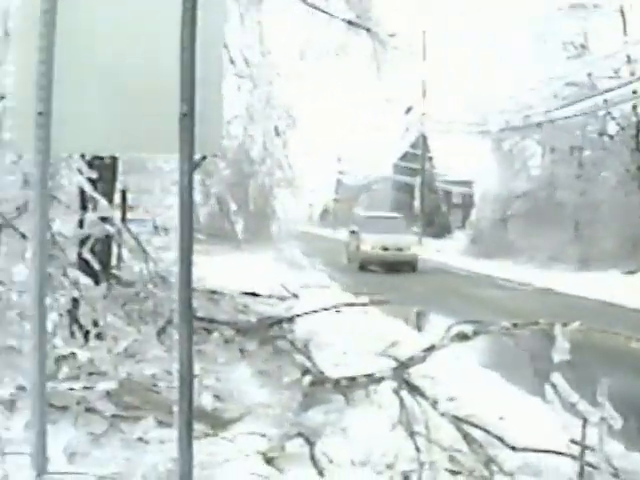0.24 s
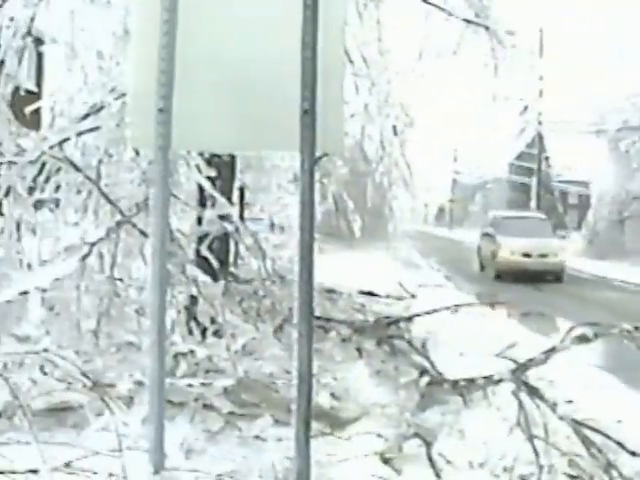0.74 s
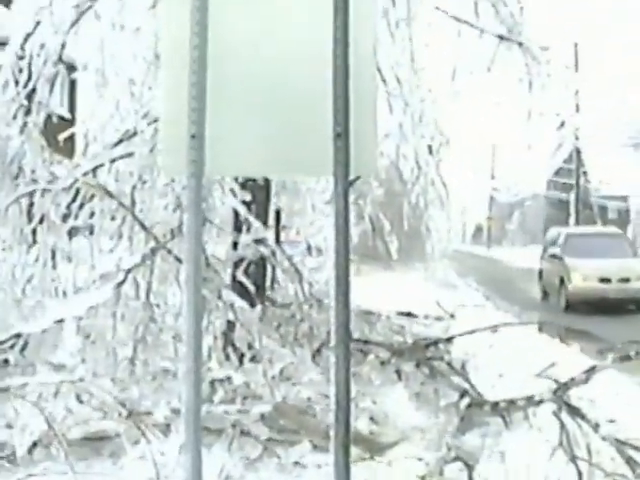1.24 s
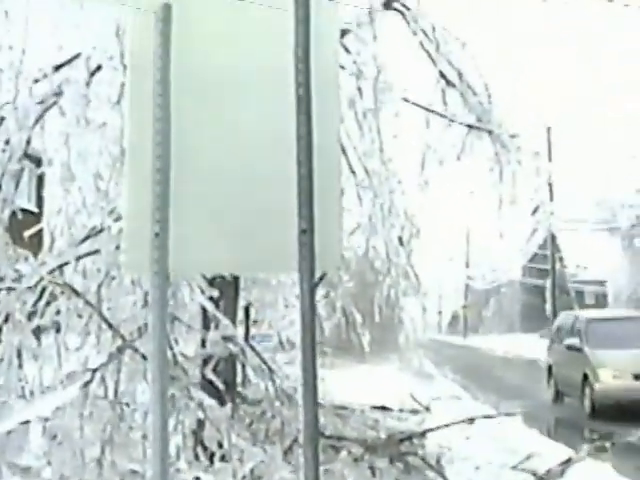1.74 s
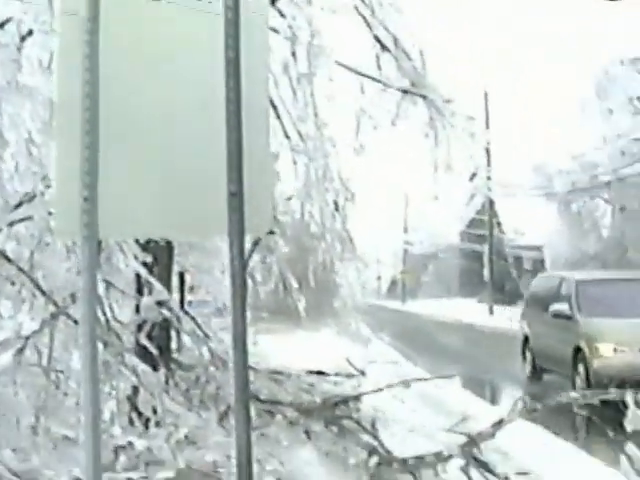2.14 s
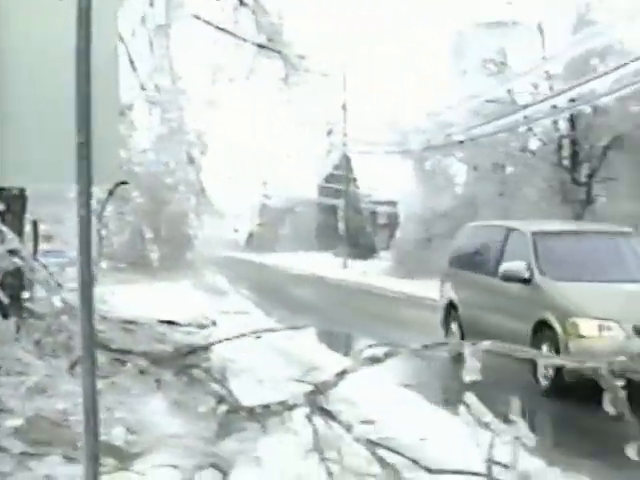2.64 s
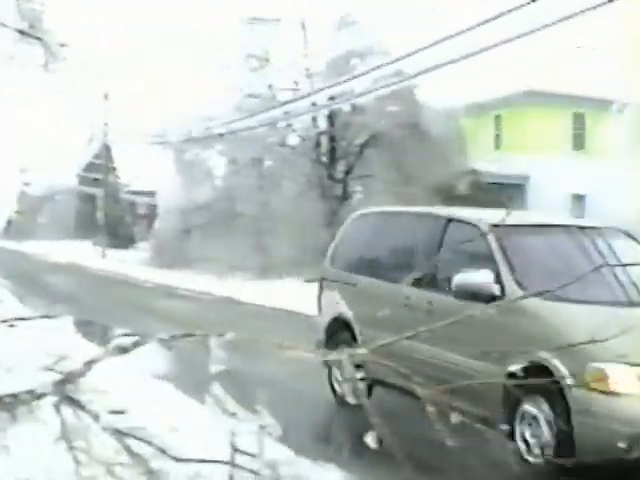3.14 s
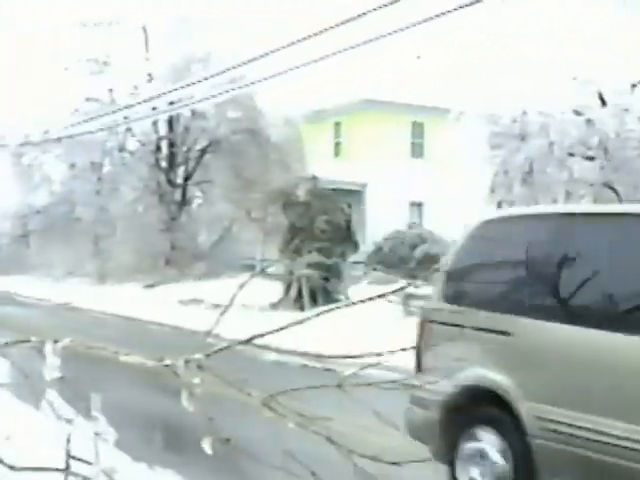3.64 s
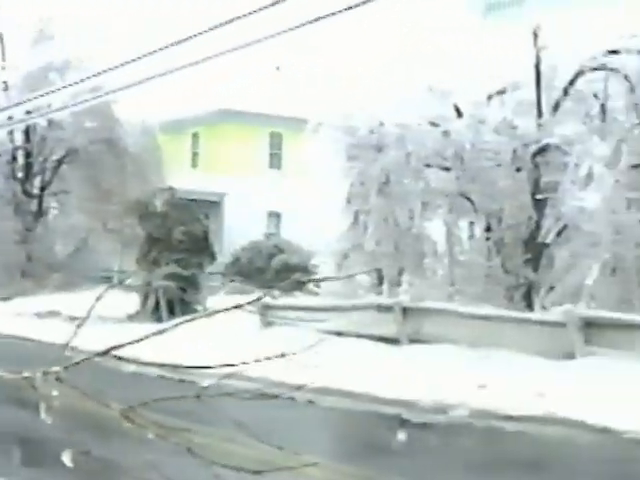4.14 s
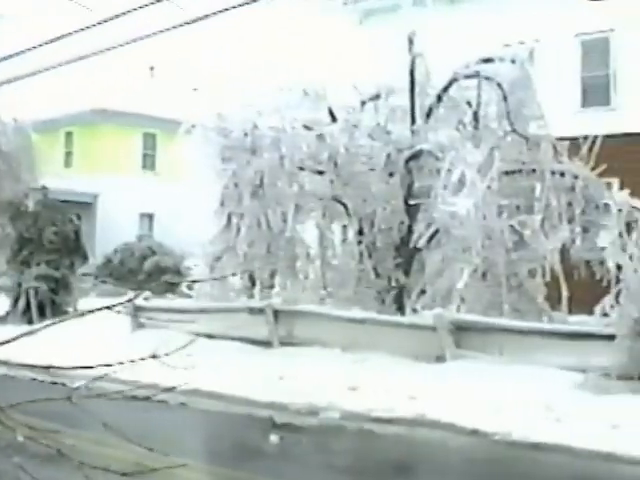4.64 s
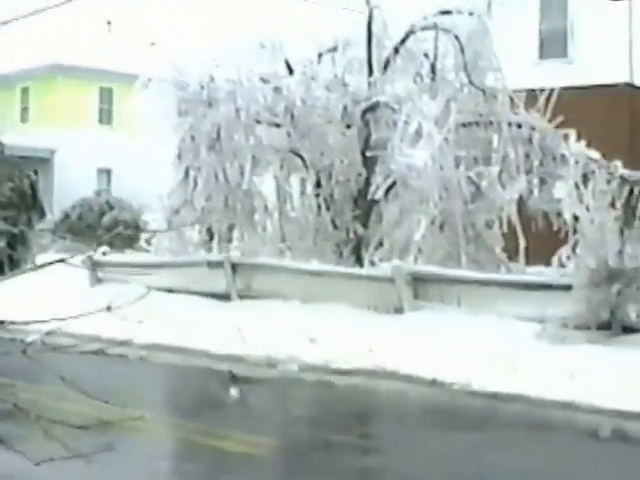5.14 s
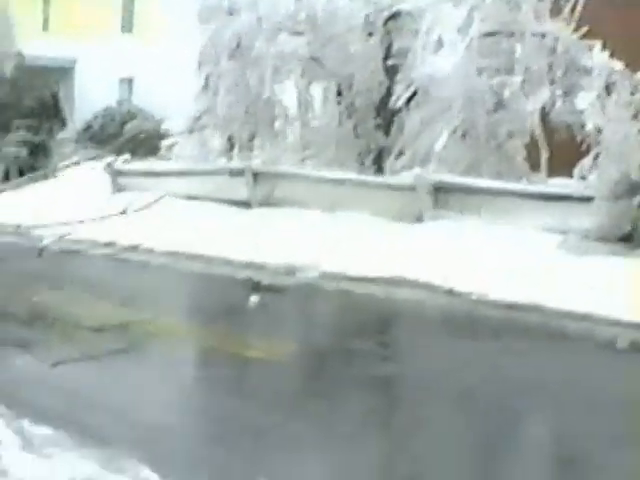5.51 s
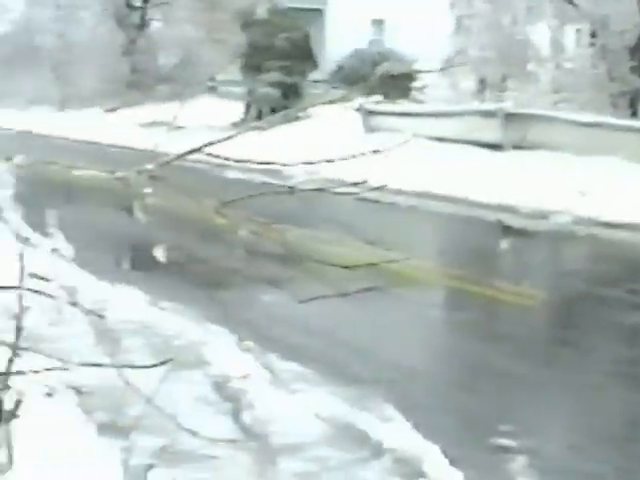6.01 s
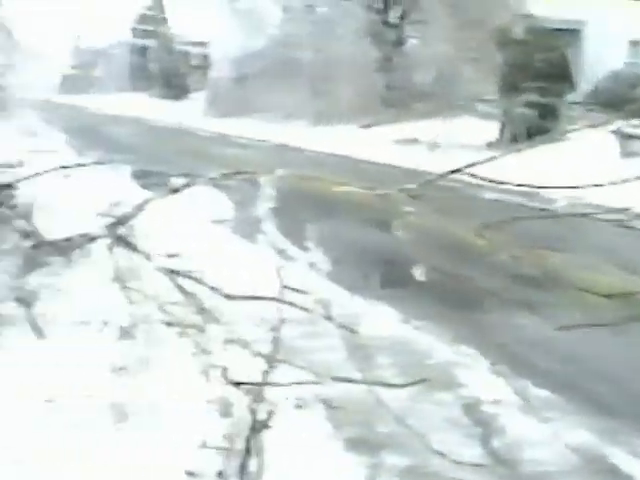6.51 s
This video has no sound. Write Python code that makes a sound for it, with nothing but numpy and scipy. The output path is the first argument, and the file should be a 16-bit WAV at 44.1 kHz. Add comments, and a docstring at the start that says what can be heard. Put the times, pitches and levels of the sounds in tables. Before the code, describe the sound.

A van approaches and passes on a slushy road outdoors, heard from the verge. Dense wet tyre hiss pulses gently with each wheel turn over a low engine rumble. A hard knock on the camera body briefly ducks the sound early on; smaller knocks follow. As the van recedes, fine spray, a sliding tyre resonance and a faint exhaust drone emerge, then fade. Nearly everything sits in the left channel.

```python
"""Minivan passing on a slushy road

A minivan rolls past on a wet, slushy road, heard from the verge through a hand-held camcorder.
The tyres are shaped noise: droplet hiss that swells with each wheel turn, fine spray, sliding resonances and a roar.
Noise rumble and a wavering sine drone make the engine; decaying sines make the knocks on the camera body.
The hardest knock makes the gain control duck. Nearly all sound is in the left channel."""
import sys
import numpy as np
from scipy import signal
from scipy.fft import rfft, irfft, next_fast_len
from scipy.io import wavfile
from scipy.ndimage import uniform_filter1d, map_coordinates

SR = 44100
rng = np.random.default_rng(int(sys.argv[2]) if len(sys.argv) > 2 else 0)


def generate_wav(sig):
    """Save sig (samples, or channels by samples) to the path in sys.argv[1] as 16-bit PCM at SR."""
    pcm = np.round(np.clip(np.atleast_2d(sig).T, -1, 1) * 32767).astype(np.int16)
    wavfile.write(sys.argv[1], SR, pcm)


N = 298557  # length in samples


def amp(db):
    """Decibels to gain."""
    return 10 ** (np.asarray(db) / 20)


def unit(x):
    """Scale to rms 1."""
    return x / np.sqrt(np.mean(x ** 2) + 1e-20)


def curves(rows):
    """One value per sample for each column after the time."""
    times, *columns = np.transpose(rows)
    t = np.arange(N) / SR
    return [np.interp(t, times, column) for column in columns]


def wobble(rate):
    """A smooth random curve, rate knots a second."""
    knots = rng.standard_normal(int(N * rate / SR) + 4)
    return map_coordinates(knots, [np.arange(N) * rate / SR])


def filtered(x, response):
    """x times a response of frequency, padded so that the end does not wrap round."""
    m = next_fast_len(N + SR // 4)
    spectrum = rfft(x, m) * response(np.fft.rfftfreq(m, 1 / SR))
    return irfft(spectrum, m)[..., :N]


def coloured(x, spectrum):
    """x shaped by (Hz, dB) points on a log frequency axis, at rms 1."""
    f, db = np.transpose(spectrum)
    return unit(filtered(x, lambda hz: amp(np.interp(np.log(hz + 1), np.log(f), db))))


def rush(patchy_db):
    """White noise whose time-frequency patches have random gain, like uneven turbulence."""
    z = signal.stft(rng.standard_normal(N), nperseg=1024)[2]
    field = uniform_filter1d(rng.standard_normal(z.shape), size=7, axis=0)  # across frequency
    field = uniform_filter1d(field, size=9, axis=1)  # across time
    patches = z * amp(patchy_db * unit(field))
    return unit(signal.istft(patches, nperseg=1024)[1][:N])


def splatter(rate, spread_db, share, patchy_db):
    """Tiny droplet impacts of uneven size, rate a second, take a share of the power; the rest is rush."""
    impacts = (rng.random(N) < rate / SR) * rng.choice([-1, 1], N)
    drops = impacts * amp(spread_db * np.clip(rng.standard_normal(N), -2, 2))
    return np.sqrt(share) * unit(drops) + np.sqrt(1 - share) * rush(patchy_db)


def circuit_hiss():
    """Faint steady noise of the camera's own circuits."""
    spectrum = [(100, 14), (600, 1), (10500, -2.0), (12000, -20)]  # Hz, relative dB
    return amp(-72.5) * coloured(rng.standard_normal(N), spectrum)


# Colour of the low rumble of engine and road. Each row: frequency in Hz, relative level in dB per Hz.
RUMBLE_COLOUR = [(25, -41), (48, -46), (68, -5.5), (90, -17.5), (130, -8.5), (180, -2.5), (260, 1),
                 (340, -4), (450, -6), (700, -9.5), (1500, -31.5)]
# Loudness of that rumble at the verge. Each row: time in seconds, level in dB.
RUMBLE_LEVEL = [(0, -43), (0.9, -37.5), (2.0, -39), (2.9, -40.5), (3.5, -45), (4.2, -40), (5.1, -38),
                (6.77, -40)]
# The exhaust droning as the van draws away. Each row: time in seconds, pitch in Hz, level in dB.
EXHAUST_DRONE = [(3.8, 345, -57), (4.25, 338.5, -46), (5.2, 329.6, -48), (6.77, 329.4, -64)]


def engine():
    """Low noise rumble of engine and road, with an exhaust note unsteady in pitch and level."""
    rumble_db = curves(RUMBLE_LEVEL)[0]
    rumble = amp(rumble_db) * coloured(rush(patchy_db=2.5), RUMBLE_COLOUR)
    hz, drone_db = curves(EXHAUST_DRONE)
    phase = 2 * np.pi * np.cumsum(hz * (1 + 0.034 * wobble(40))) / SR
    note = np.sin(phase) * amp(3.5 * wobble(11))
    return rumble + amp(drone_db) * unit(note)


# Knocks on the camera, right at the microphone.
# Each row: start in seconds, ring pitch in Hz, ring level in dB, thud level in dB, both before decay and low cut.
CAMERA_KNOCKS = [(1.2175, 203, -6.5, -0.5), (1.549, 178, -26, -10), (2.295, 160, -31.5, -17.5),
                 (2.469, 238, -27, -27), (3.924, 172, -27, -25), (5.436, 182, -23, -8),
                 (5.518, 220, -24, -40), (5.625, 165, -28, -27), (6.419, 171, -21, -28)]
TICK_DB = -2.5  # tick of a knock relative to its thud


def decaying_mode(t, hz, t60):
    """A sine that falls 60 dB in t60 seconds, like one struck resonance."""
    return np.sin(2 * np.pi * hz * t) * 1000 ** (-t / t60)


def knocks(ring_t60=0.087, low_cut_hz=135):
    """Each knock gives a soft plastic tick, a dull thud and a short low ring of the camera body."""
    out = np.zeros(N + SR)
    t = np.arange(SR // 4) / SR
    contact = 1 - np.exp(-t / 0.0006)  # a soft contact rounds the onset
    thud = decaying_mode(t, 340, 0.014)
    tick = decaying_mode(t, 1750, 0.009) - 0.5 * decaying_mode(t, 1000, 0.009)
    blow = contact * (thud + amp(TICK_DB) * tick)
    for s, hz, ring_db, thud_db in CAMERA_KNOCKS:
        ring = amp(ring_db) * decaying_mode(t, hz, ring_t60) * (1 - np.exp(-t / 0.001))
        out[round(s * SR):][:len(t)] += ring + amp(thud_db) * blow
    # the small body passes no deep bass
    low_cut = signal.butter(4, low_cut_hz, "highpass", fs=SR, output="sos")
    return signal.sosfilt(low_cut, out[:N])


# The tyres coming nearer, passing and receding. Each row: time in seconds, level of the tyre noise in dB.
PASS_LEVEL = [(0, -22.5), (0.5, -24.5), (1.15, -25.5), (1.52, -27), (1.92, -22), (2.5, -20), (2.66, -23.5),
              (2.77, -21.5), (3.4, -22.5), (4.0, -23.5), (4.4, -23.5), (4.8, -23.5), (5.65, -26.5),
              (6.1, -28), (6.77, -30.5)]
# A tyre cutting through deeper slush. Each row: time of the surge in seconds, extra level in dB.
PUDDLES = [(2.36, 2.8), (3.75, 0.5)]
PUDDLE_S = 0.055  # half the length of a surge, seconds


def slush():
    """Level of the tyre noise in dB: the slow pass, with a short surge at each puddle."""
    t = np.arange(N) / SR
    surges_db = sum(db * np.exp(-((t - s) / PUDDLE_S) ** 2) for s, db in PUDDLES)
    return curves(PASS_LEVEL)[0] + surges_db


WHEEL_TURNS_PER_S, FIRST_SWELL_S, SWELL_DB = 2.99, 0.093, 1.4


def wheel_swell():
    """Rise and fall in dB, by SWELL_DB either way, over each turn of the wheels."""
    t = np.arange(N) / SR
    return SWELL_DB * np.cos(2 * np.pi * WHEEL_TURNS_PER_S * (t - FIRST_SWELL_S))


# Which side of the van faces the verge.
# Each row: time in seconds, side heard (0 far ahead, 1 close beside, 2 behind).
SIDE_HEARD = [(0, 0.087), (1.2, 0.31), (1.8, 0.88), (3.5, 1.12), (3.72, 0.9), (4.0, 1.84), (6.77, 1.943)]


def side_heard():
    """The side of the van that is heard, sliding from 0 (far ahead) towards 2 (behind)."""
    return np.clip(curves(SIDE_HEARD)[0], 0, 2)


# Colour of the tread roar off the road. Each row: frequency in Hz, relative level in dB per Hz.
ROAR_COLOUR = [(150, -31), (350, -14.5), (520, -10.5), (750, -5.5), (1000, -2.5), (1300, -0.5),
               (1600, -4.5), (2200, -24.5), (5000, -68)]
# roar relative to the pass level from far ahead, and its gain for each step of side
ROAR_AHEAD_DB, ROAR_TURN_DB = -6.5, 1.17


def tread_roar(side, swell_db, roar_swell=0.18):
    """Dull, fairly even noise of the tread, stronger from behind."""
    roar_db = ROAR_AHEAD_DB + ROAR_TURN_DB * side + roar_swell * swell_db
    return amp(roar_db + 1.0 * wobble(30)) * coloured(rush(patchy_db=0.25), ROAR_COLOUR)


# Colour of the fine spray off the tyres. Each row: frequency in Hz, relative level in dB per Hz.
SPRAY_COLOUR = [(3000, -19), (5500, 3), (6800, 0.5), (8200, 0), (9800, 1.5), (11000, -9), (12300, -15.5),
                (13500, -56), (14200, -42)]
# Spray masked as the van comes alongside, strongest in its wake.
# Each row: time in seconds, level in dB relative to the pass level.
SPRAY_LEVEL = [(0, -14.5), (0.3, -13.5), (0.5, -15.5), (1.3, -17), (2.0, -24), (3.0, -21.5), (3.75, -15),
               (4.55, -12.5), (5.1, -17), (6.3, -20.5)]


def spray(swell_db, spray_swell=0.28):
    """High, fluttering noise of droplets of very uneven size."""
    spray_db = curves(SPRAY_LEVEL)[0] + spray_swell * swell_db
    droplets = splatter(rate=4500, spread_db=8, share=0.3, patchy_db=2.2)
    return amp(spray_db + 1.04 * wobble(56)) * coloured(droplets, SPRAY_COLOUR)


# Wet treads resonating, high from the front, lower from behind, rising again with distance.
# Each row: time in seconds, centre in Hz, level in dB relative to the pass level.
RESONANCE = [(1.55, 1900, -16), (1.8, 1880, -8), (3.55, 1995, -7), (3.8, 1500, -20), (4.1, 1280, -19),
             (4.7, 1319, -11), (5.35, 1478, -4.5), (5.95, 1675, -4.5), (6.77, 1783, -9)]
# Bands of that resonance, moving together. Each row: multiple of the centre, width in Hz, level in dB.
RESONANCE_BANDS = [(0.498, 170, -11), (1, 547, 0), (1.711, 320, -7.5)]


def tread_resonance(flutter_db=1.4):
    """Fluttering bands of the wet tyre noise that slide together as the van turns past."""
    hz, level_db = curves(RESONANCE)
    phase = 2 * np.pi * np.cumsum(hz) / SR
    out = np.zeros(N)
    for multiple, width_hz, db in RESONANCE_BANDS:
        # two slow noises on a cosine and a sine make a noise band round the moving centre
        a, b = filtered(rng.standard_normal((2, N)), lambda f: 1 / (1 + (2 * f / width_hz) ** 4))
        band = a * np.cos(multiple * phase) + b * np.sin(multiple * phase)
        out += amp(db) * unit(band * amp(flutter_db * wobble(24)))
    return amp(level_db) * out


# Colour of the hiss with the van far ahead. Each row: frequency in Hz, relative level in dB per Hz.
HISS_FAR = [(700, -23.5), (1250, -5), (1650, 2.5), (2100, 0), (2450, 1), (2850, 1.5), (3400, 0.5),
            (4350, -3), (5200, -13.5), (6600, -21), (8200, -60), (14000, -48)]
# Colour of the hiss close beside, from ahead of the tyres. Each row: frequency in Hz, relative level in dB per Hz.
HISS_FRONT = [(700, -34.5), (1250, -15.5), (1600, -3), (1970, -0.5), (2400, -3.5), (2780, -1.5), (3300, -7),
              (4300, -8.5), (5300, -18), (6700, -22), (8200, -33), (14000, -60)]
# Colour of the hiss from behind the tyres. Each row: frequency in Hz, relative level in dB per Hz.
HISS_REAR = [(700, -27), (1250, -3), (1700, 1.5), (2120, -2), (2530, -0.5), (3100, -4.5), (3700, -3.5),
             (4400, -10.5), (5400, -20.5), (7000, -36.5), (9000, -35), (14000, -57)]


def slush_hiss(side, swell_db, hiss_gain_db=0.63):
    """Dense droplets over a rush of water, changing colour as the van goes by."""
    hiss = np.zeros(N)
    for place, colour in enumerate([HISS_FAR, HISS_FRONT, HISS_REAR]):
        share = np.maximum(1 - np.abs(side - place), 0)  # neighbouring colours blend at constant power
        droplets = splatter(rate=3000, spread_db=1.5, share=0.22, patchy_db=1.5)
        hiss += np.sqrt(share) * coloured(droplets, colour)
    flutter_db = 0.58 * wobble(45) + 0.42 * wobble(160)  # lumps of slush make the hiss flutter
    return hiss * amp(hiss_gain_db + swell_db + flutter_db)


# The tyre noise dulling and dropping for an instant. Each row: time in seconds, treble depth in dB.
DIPS = [(.948, 2), (1.824, 13.5), (2.452, 11), (4.001, 13)]
DIP_S = 0.0055  # half the length of a dip, seconds


def dipped(x, split_hz=3200, low_share=0.31):
    """Brief dips take more from the treble than from the rest."""
    t = np.arange(N) / SR
    dips_db = sum(depth_db * np.exp(-((t - s) / DIP_S) ** 2) for s, depth_db in DIPS)
    low = filtered(x, lambda hz: 1 / (1 + (hz / split_hz) ** 4))
    treble = x - low
    return amp(-low_share * dips_db) * low + amp(-dips_db) * treble


def tyres():
    """Hiss, resonance, spray and roar all follow the slush; all but the resonance follow the wheels."""
    swell_db = wheel_swell()
    side = side_heard()
    noise = slush_hiss(side, swell_db) + tread_resonance() + spray(swell_db) + tread_roar(side, swell_db)
    return dipped(amp(slush()) * noise)


def scene():
    """The left channel carries the sound; the right holds only a trace of it and faint circuit hiss."""
    air = engine() + knocks() + tyres()
    return np.array([air, amp(-53.5) * air + circuit_hiss()])


def gain_control(x, ceiling_db=-15.0, release_s=0.42):
    """A burst of power over the ceiling pulls the gain down at once; it creeps back up."""
    power = uniform_filter1d((x ** 2).max(0), size=176)  # over 4 ms, louder channel
    power = np.abs(power)  # the running mean can round just below zero
    over_db = np.maximum(10 * np.log10(power + 1e-12) - ceiling_db, 0)
    # hold each peak of the excess while it decays exponentially
    fade = np.exp(-np.arange(N) / SR / release_s)
    held_db = np.maximum.accumulate(over_db / fade) * fade
    return x * amp(-uniform_filter1d(held_db, size=48))


def record(dry, top_hz=13700, offset=0.125):
    """Gain control, a sharp band limit, and the steady offset of the converter."""
    return filtered(gain_control(dry), lambda hz: hz < top_hz) + offset


dry = scene()
out = record(dry)
generate_wav(out)
```